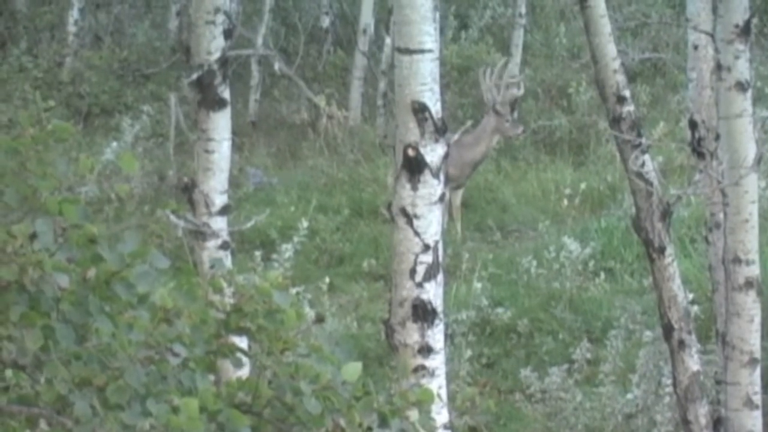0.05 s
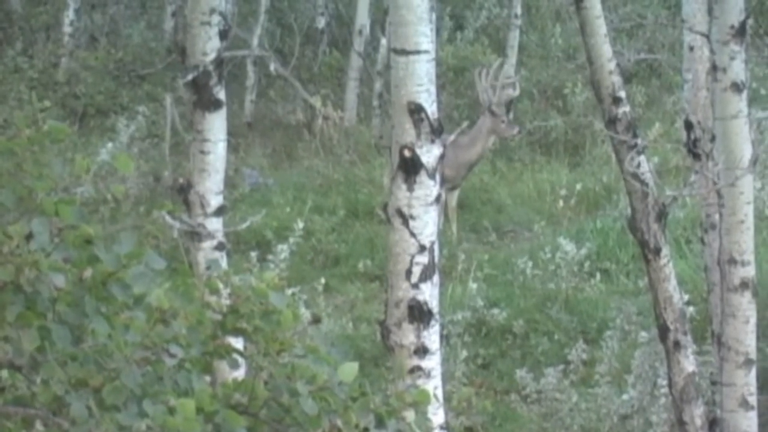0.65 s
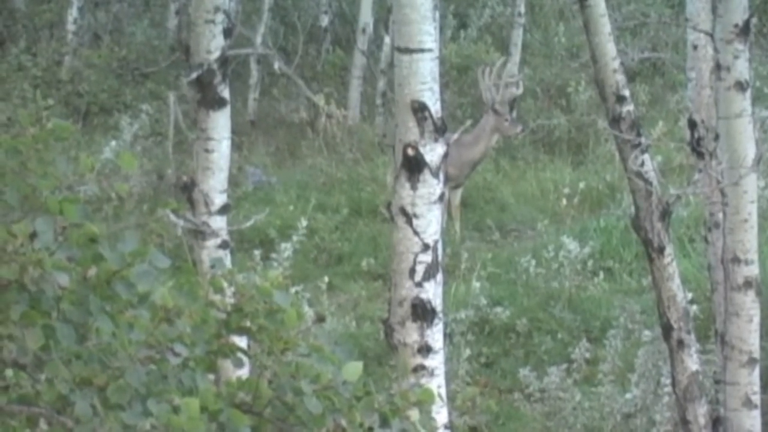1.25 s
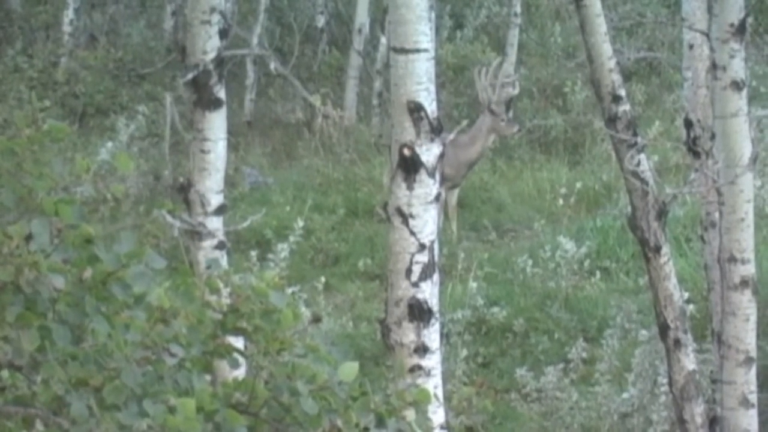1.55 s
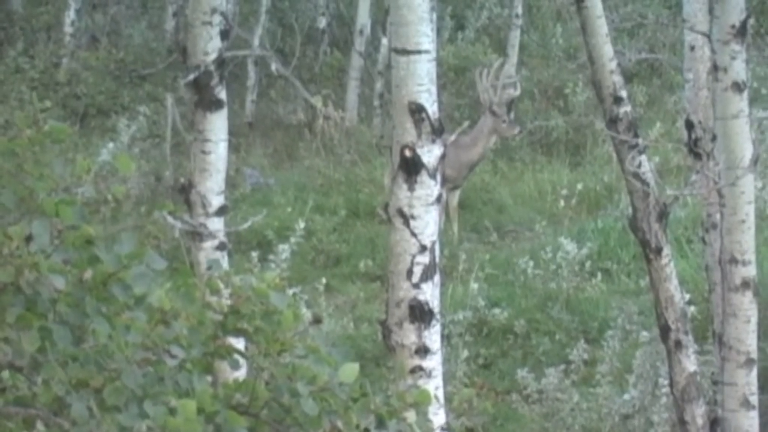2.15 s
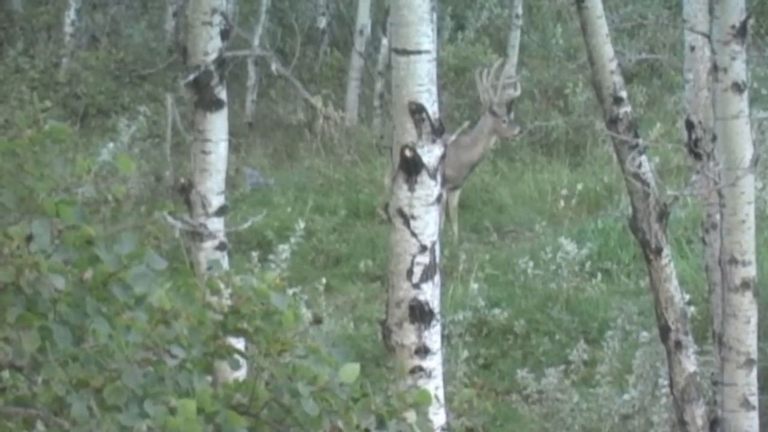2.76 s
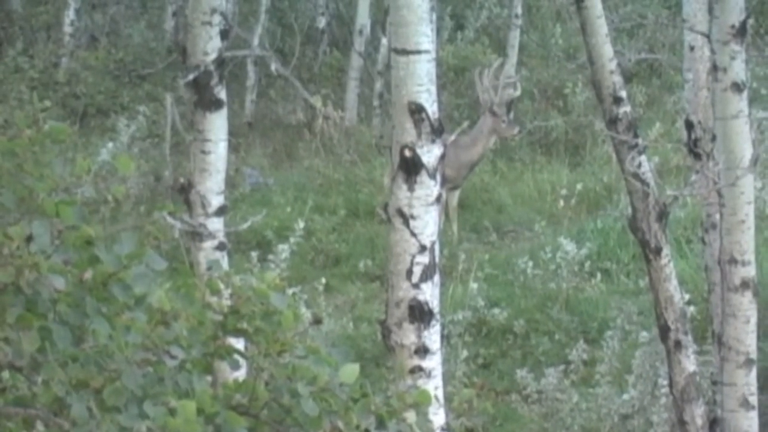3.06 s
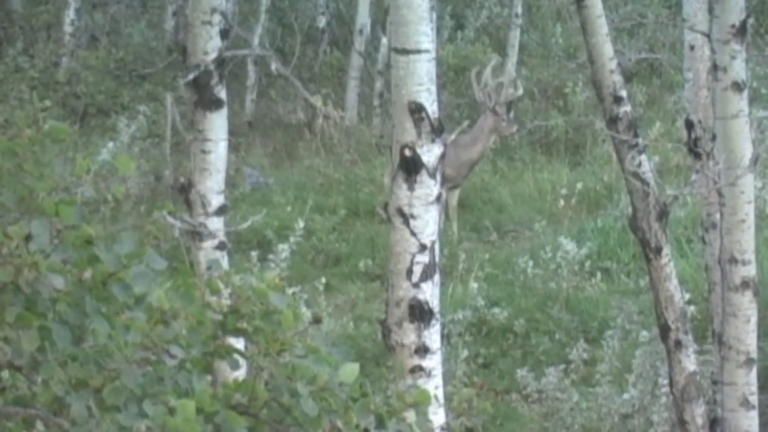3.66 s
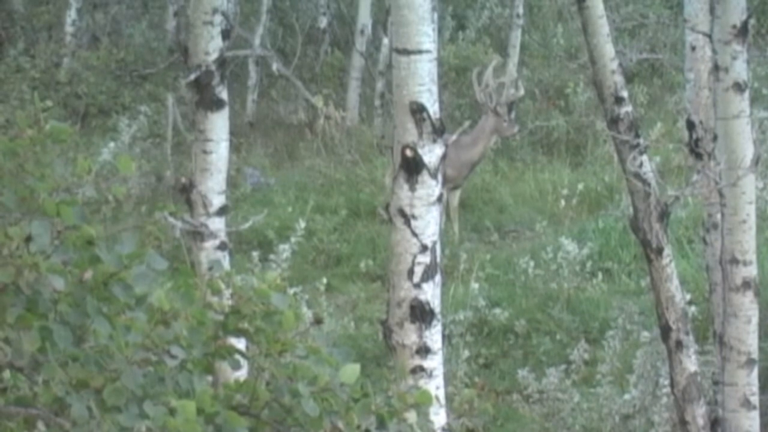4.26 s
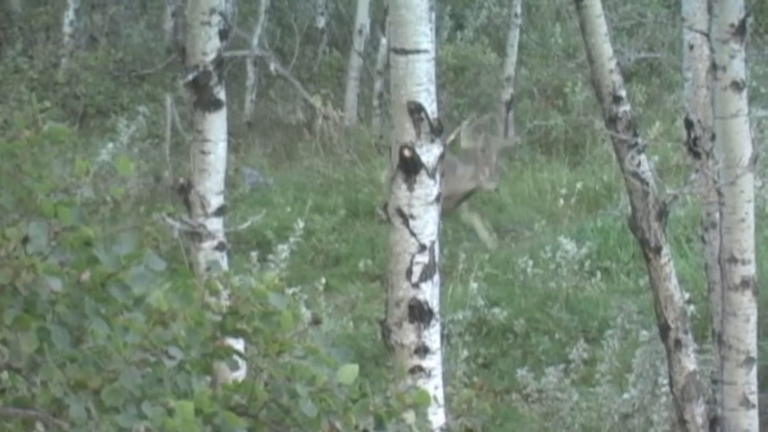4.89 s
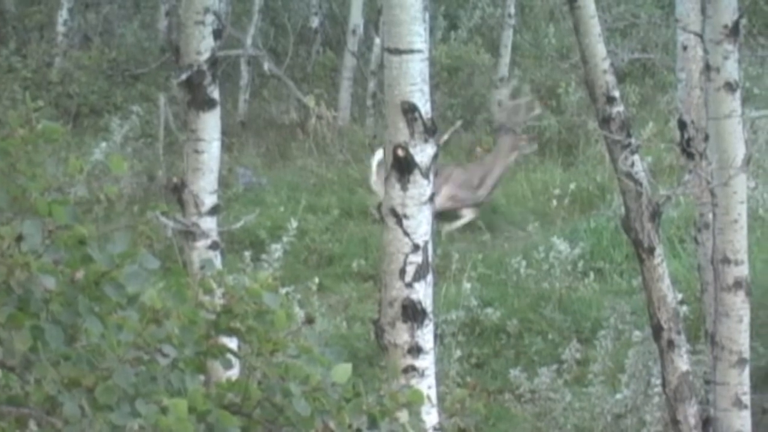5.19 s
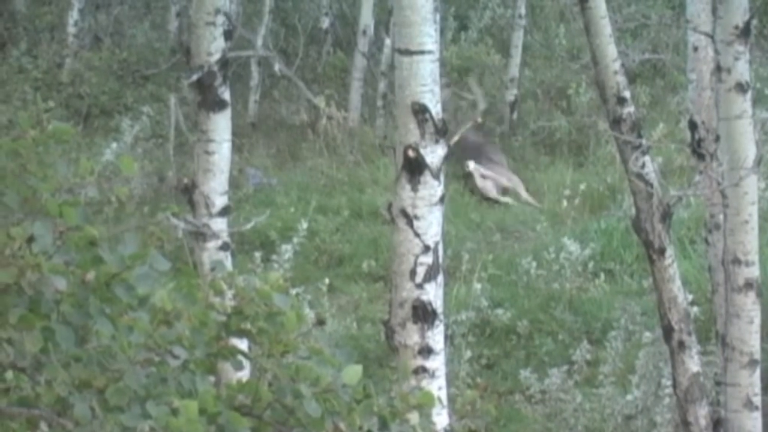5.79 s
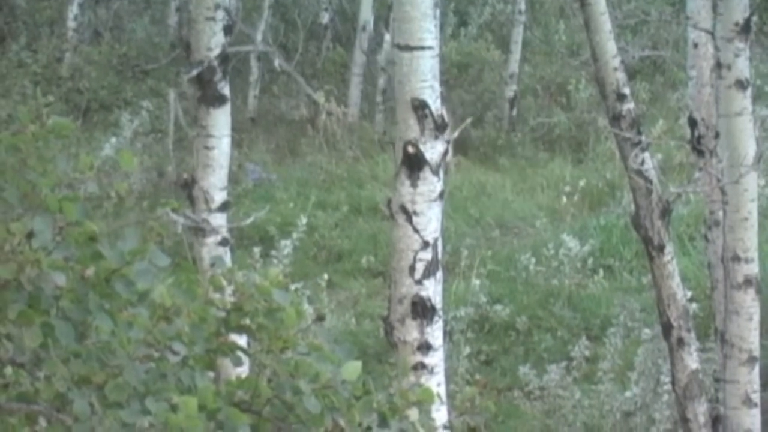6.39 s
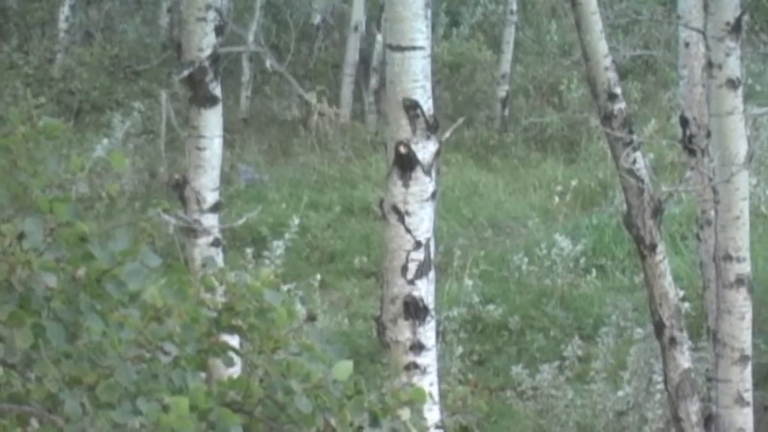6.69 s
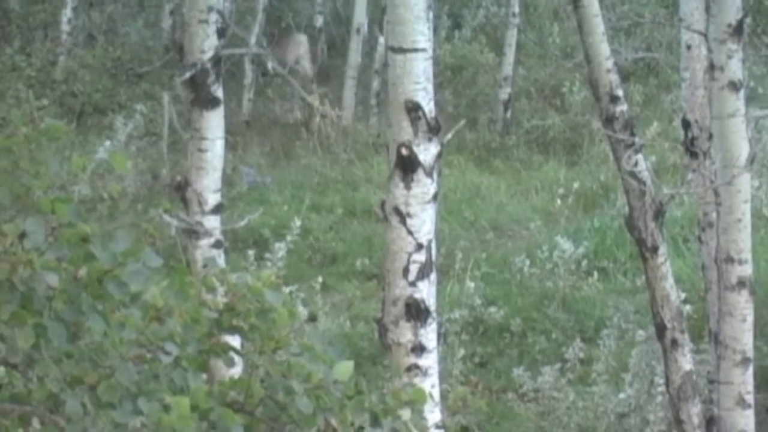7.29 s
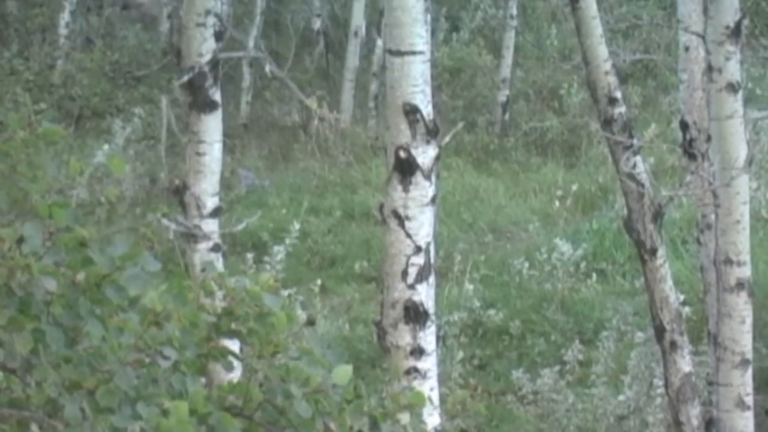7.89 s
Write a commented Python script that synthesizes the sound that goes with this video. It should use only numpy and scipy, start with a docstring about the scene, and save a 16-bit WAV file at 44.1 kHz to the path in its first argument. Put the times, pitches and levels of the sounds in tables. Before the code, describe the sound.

One sharp, loud bow shot cracks just left of the microphone after several seconds of soft outdoor air and faint grasshoppers. The string twangs, the trees echo briefly and the arrow lands with a slap and thump. Faint birdlike whistles follow as a deer runs off, its hooves thudding lightly under growing leaf rustle and breaking twigs. Hollow gear clacks and a low handling rumble come near the end.

```python
"""Bow shot at a deer in an aspen wood.

Grasshoppers hiss, then stop. Just left of a camera a compound bow fires: the release clicks, the arrow
zips over its rest, the string slaps and twangs. A third of a second later the arrow hits with a thump.
Faint whistles waver as the deer bounds off through brush, breaking twigs; gear clacks and rumbles."""
import sys
import numpy as np
from scipy import signal
from scipy.fft import rfft, irfft, next_fast_len
from scipy.io import wavfile
from scipy.ndimage import uniform_filter1d

SR = 44100
rng = np.random.default_rng(int(sys.argv[2]) if len(sys.argv) > 2 else 0)


def int16_out(signal):
    """Quantize to a 16-bit WAV file."""
    q = np.round(np.clip(np.atleast_2d(signal).T, -1, 1) * 32767)
    wavfile.write(sys.argv[1], SR, q.astype(np.int16))


N = 358974
T = np.arange(N) / SR
RELEASE_S, STRING_S, IMPACT_S = 4.6322, 4.6490, 4.9520


# Release, cams, string stop and fittings.
# Each row: start in seconds, level in dB, centre in Hz, t60 in seconds, left minus right in dB.
BOW_KNOCKS = [(4.6317, -31, 220, 0.049, 5), (4.6316, -17.5, 2100, 0.03, 12.5),
              (4.632, -7, 7900, 0.019, 4.5), (4.6363, -18, 6500, .016, 11), (4.6395, -16, 7000, 0.025, 7),
              (4.6503, -2, 8500, 0.0045, 2), (4.6510, -21, 1200, 0.04, 9), (4.6544, -11, 5200, 0.014, 7),
              (4.6740, -27, 6500, 0.016, 5), (4.6815, -31, 5500, .015, 8), (4.6895, -25, 5500, 0.012, 10)]
# String loop and cams. Each row: frequency in Hz, level in dB, t60 in seconds.
RELEASE_MODES = [(744, -35, 0.055), (1586, -20, .04), (2053, -20, .045), (2440, -21, .035),
                 (3520, -22, 0.033), (5700, -20, .025), (7580, -15, .025)]
# Each row: frequency in Hz, gain in dB.
BOW_ECHO_SPECTRUM = [(120, -5), (400, -4), (800, -3), (1200, -3.5), (2400, -6), (3500, -1.5), (5000, -4),
                     (8000, -10), (15000, -19.5)]

def bow():
    """Knocks, zip, buzz and twang, close on the left, echoed by the wood."""
    out = arrow_zip() + fittings_buzz()
    for s, db, hz, t60, pan_db in BOW_KNOCKS:
        side_db = -4.5 + 5.6 * np.log2(hz / 7000)  # the microphone ports differ only for short waves
        add(out, s, pan(crack(db, hz, t60, breadth=0.81, side_db=side_db, rise_s=0.00068), pan_db))
    add(out, RELEASE_S, ring(RELEASE_MODES, pan_db=13, rise_s=0.0004))
    add(out, STRING_S, twang())
    add(out, STRING_S, crack(db=-36, hz=113, t60=0.06, breadth=0.74))
    out[1] = np.roll(out[1], 2)  # the sound reaches the right port later
    echo = bang_echo(STRING_S, BOW_ECHO_SPECTRUM, early_db=-23, early_t60=0.081,
                     late_db=-34.5, late_t60=0.83, side_db=-8)
    return out + pan(echo, 2.7)


# Each row: harmonic number, level in dB, t60 in seconds.
STRING_PARTIALS = [(1, -39, 1.2), (2, -28.5, 0.52), (3, -45, .55), (4, -46.5, 0.83), (7, -51, .6),
                   (8, -51, .5)]
# Limbs, then riser and fittings. Each row: frequency in Hz, level in dB, t60 in seconds.
LIMB_MODES = [(112, -25, .04), (232, -16, .055), (610, -29, .05)]
RISER_MODES = [(104, -42, .5), (692, -38, .39), (847.5, -29, 0.28), (935, -25.5, 0.13), (1023, -33, .2),
               (1250, -41, .3), (1630, -41, .25), (2060, -36, 0.22), (2326, -38, .22), (2680, -21, 0.066),
               (3429, -38, .33), (3550, -34, .25), (4730, -45, .35)]

def twang(nominal_hz=140, slack=0.21, settle_s=0.011, sag_per_s=0.192, rough_db=0.7):
    """The string pulls taut, then sinks in pitch as its swing dies; limbs slam and the riser rings."""
    t = np.arange(SR) / SR
    pitch_hz = nominal_hz * (1 - slack * np.exp(-t / settle_s)) * (1 - sag_per_s * t)
    phase = 2 * np.pi * np.cumsum(pitch_hz) / SR
    string = 0
    for harmonic, db, t60 in STRING_PARTIALS:
        flicker_db = rough_db * min(harmonic, 4) * wander(34)[:SR]
        string += undb(db + flicker_db) * fade(t, t60) * np.sin(harmonic * phase)
    string *= 1 - np.exp(-t / 0.0018)
    return pan(string, 1) + ring(LIMB_MODES, pan_db=3) + ring(RISER_MODES, pan_db=6, rise_s=0.012)


# Each row: start in seconds, length in seconds, first pitch in Hz, last pitch in Hz, level in dB.
ZIPS = [(4.6444, 0.0026, 1900, 2900, -11), (4.6476, 0.0021, 3300, 4600, -8.5),
        (4.6544, 0.0014, 4600, 4150, -13.5), (4.6578, .001, 3900, 3500, -17)]

def arrow_zip(pan_db=16, rasp=0.21):
    """The shaft sings over its rest, rising as it speeds up and falling as the cams brake."""
    scrape = rasp * colour(rng.standard_normal(N), [(1500, 0), (6000, -7), (14000, -7)])
    out = np.zeros(N)
    for s, length_s, from_hz, to_hz, db in ZIPS:
        pitch_hz = glide(s, length_s, from_hz, (to_hz - from_hz) / length_s)
        phase = 2 * np.pi * np.cumsum(pitch_hz) / SR
        out += (np.sin(phase) + scrape) * swell(s, length_s, attack_s=0.00075, t60=0.0027) * undb(db)
    return pan(out, pan_db)


# Each row: centre in Hz, width in Hz, gain in dB.
BUZZ_MODES = [(524, 230, -13.5), (913, 100, -5), (1420, 610, -15), (2390, 770, -15.5), (3800, 1200, -22),
              (5400, 1100, -23), (9000, 6500, -22.5)]

def fittings_buzz(rate_hz=250, depth=0.38, db=-25):
    """Loose fittings chatter about twice per swing of the string while the limbs swing widely."""
    force = rng.standard_normal((2, N)) * (1 + depth * np.sin(2 * np.pi * rate_hz * T))
    metal = unit(resonate_modes(force, BUZZ_MODES))
    envelope = swell(s=4.652, length_s=0.036, attack_s=0.0065, t60=0.033)
    return pan(spread(metal, -6), 6.1) * envelope * undb(db)


# Each row: start in seconds, level in dB, centre in Hz, t60 in seconds.
HIT_CRACKS = [(4.9513, -20, 4000, 0.021), (4.9532, -12, 4900, 0.006), (4.953, -18, 540, 0.018),
              (4.9585, -23, 4000, 0.016), (4.9718, -30, 2700, .006)]
# Each row: frequency in Hz, gain in dB.
HIT_ECHO_SPECTRUM = [(100, 1), (250, -2.5), (500, -0.5), (1200, -4.5), (2500, -2.5), (4500, -6.5),
                     (7000, 1.5), (10000, -10), (15000, -21)]

def arrow_hit(thump_db=-19, thump_hz=165, delay_s=0.0136, width_s=0.0045):
    """The arrow slaps the hide and drives through; the chest thumps and booms, the clearing echoes."""
    out = np.zeros((2, N))
    for s, db, hz, t60 in HIT_CRACKS:
        add(out, s, crack(db, hz, t60, breadth=2.1, side_db=-22, rise_s=0.00054))
    t = T - IMPACT_S - delay_s
    out += undb(thump_db) * np.exp(-(t / width_s) ** 2) * np.sin(2 * np.pi * thump_hz * t)
    boom = ring([(110, -35.5, 0.17)])
    add(out, IMPACT_S + delay_s, boom)
    echo = bang_echo(IMPACT_S, HIT_ECHO_SPECTRUM, early_db=-33, early_t60=0.11,
                     late_db=-33, late_t60=0.46, side_db=-10)
    return out + pan(echo, 1)


# Each row: start in seconds, length in seconds, then relative levels of leaves, stems and ground in dB.
BOUNDS = [(4.99, .09, -48.5, -58, -58), (5.197, 0.038, -49.5, -54, -55), (5.28, 0.028, -51, -54, -68),
          (5.447, 0.14, -43.5, -56, -53), (5.536, 0.042, -47, -52, -58), (5.637, .025, -48, -55, -58),
          (5.675, 0.047, -46.5, -50, -51.5), (5.763, 0.085, -46.5, -58, -52), (5.892, 0.08, -44, -58, -54),
          (6.025, 0.06, -36, -53, -55), (6.13, .03, -46.5, -58, -60), (6.254, 0.032, -49, -60, -62),
          (6.333, .11, -49, -58, -63), (6.454, 0.098, -43.5, -55, -58), (6.565, 0.028, -47, -62, -62),
          (6.624, 0.027, -45, -58, -53), (6.751, .055, -46, -41, -56), (6.858, 0.054, -46, -49, -55),
          (6.989, 0.036, -45, -52.5, -60), (7.1, .05, -48, -44.5, -58), (7.22, 0.068, -44.5, -46, -48),
          (7.316, 0.094, -36, -46.5, -55), (7.562, 0.039, -35, -56, -62), (7.62, .03, -48, -50, -54),
          (7.776, 0.13, -50, -51, -61), (8.016, 0.039, -51, -53, -58)]
# Steady rustle, loudest in the densest thicket. Each row: time in seconds, level in dB.
THICKET_LEVELS = [(5.0, -58.5), (5.42, -57), (5.6, -50), (6.2, -51.5), (6.68, -49.5), (7.0, -43.5),
                  (7.46, -41), (7.74, -45), (8.0, -52.5), (8.14, -48.5)]
# Each row: frequency in Hz, gain in dB.
LEAF_SPECTRUM = [(1180, -38), (2000, -13.5), (2320, -11.5), (3200, -6), (3980, -6.5), (5250, -1),
                 (6820, -2), (7910, -4.5), (11000, -9), (12000, -8), (13800, -17), (16000, -29)]
STEM_SPECTRUM = [(400, -17.5), (900, -2.5), (1600, -7), (2600, -5), (4500, -5.5)]
GROUND_SPECTRUM = [(90, -9.5), (200, -2), (320, -3), (700, -11), (1400, -15.5)]

def brush(stems_db=-2.5, ground_db=-2.5, widen_from_s=6.4):
    """Leaves swish, stems crackle and turf rustles under each bound of the deer, over a steady rustle."""
    thicket = level_curve(THICKET_LEVELS)
    steady_ground = thicket ** 0.29 * undb(-45) * (T > THICKET_LEVELS[0][0])
    power = np.array([thicket, thicket * undb(-8), steady_ground]) ** 2
    for s, length_s, *levels_db in BOUNDS:
        power += np.outer(undb(levels_db), swell(s, length_s, attack_s=0.031, t60=0.26)) ** 2
    leaf_gain, stem_gain, ground_gain = np.sqrt(power)
    widen_db = 6 * np.clip(T - widen_from_s, 0, 1)  # the deer gets in among the trees
    leaves = grains(LEAF_SPECTRUM, per_s=9000, scatter_db=0.71, side_db=-19 + widen_db)
    leaves *= undb(1.03 * wander(70)) * leaf_gain
    stems = grains(STEM_SPECTRUM, per_s=1800, scatter_db=1.1, side_db=-10 + widen_db / 2)
    stems *= undb(stems_db + 2.2 * wander(50)) * stem_gain
    ground = grains(GROUND_SPECTRUM, per_s=700, scatter_db=1.8, side_db=-11)
    ground *= undb(ground_db) * ground_gain
    return pan(leaves, 0.2) + pan(stems + ground, 2.9)


# Each row: start in seconds, level in dB, centre in Hz, t60 in seconds, left minus right in dB.
SNAPS = [(1.101, -47, 1200, 0.012, 7), (4.8960, -39.5, 8500, 0.0043, 26), (5.235, -46, 1110, .025, 0),
         (5.483, -39, 5710, .025, 0), (5.687, -38.5, 2300, 0.027, -2), (5.7090, -36, 7040, .039, 0),
         (5.917, -41, 5310, .03, 0), (5.9782, -12.5, 13000, 0.0029, 14.5), (5.9792, -32, 6450, 0.0099, 14),
         (6.0009, -29, 12500, .006, 11), (6.464, -30.5, 6000, 0.039, 0), (6.73, -29.5, 5830, 0.019, 19),
         (6.783, -31, 3800, .04, 2), (6.8533, -27.5, 5000, 0.016, -1), (6.8785, -26, 4900, .015, -1),
         (6.894, -35, 3970, .025, 0), (7.0558, -30, 9000, .008, 10), (7.096, -29, 5700, .008, 0),
         (7.1041, -17, 9500, .003, -1), (7.1043, -15, 4600, 0.0079, -0.5), (7.1084, -27, 4800, .012, 0),
         (7.126, -38, 3500, .025, 0), (7.237, -34, 2400, 0.027, -1), (7.256, -32.5, 4000, .025, -2),
         (7.4075, -25, 3500, 0.016, -7), (7.639, -35, 4000, .025, 0), (8.119, -41.5, 3260, 0.036, 0)]
# Hooves and small stirs in the wood. Each row: start in seconds, level in dB, centre in Hz, t60 in seconds.
THUDS = [(.745, -49, 700, .033), (1.025, -49.5, 2490, .032), (1.10, -43.5, 600, .02),
         (1.607, -51, 800, .06), (5.075, -45, 447, 0.17), (5.085, -47, 130, .12), (5.21, -46.5, 350, .06),
         (5.590, -43.5, 290, 0.088), (5.592, -43, 1100, .04), (5.91, -47, 330, 0.12),
         (6.105, -46, 220, .093), (6.112, -45.5, 1300, 0.062), (6.275, -46, 300, .06),
         (6.458, -38, 230, .078), (6.462, -39, 900, 0.034), (6.875, -44.5, 140, .13),
         (7.1, -36.5, 160, 0.077), (7.4086, -27.5, 1400, 0.045), (7.4101, -35.5, 220, 0.085),
         (7.640, -40, 150, 0.093)]
# Each row: frequency in Hz, level in dB, t60 in seconds.
LOG_MODES = [(325.5, -21.5, 0.065), (550, -32, 0.055), (691, -31, .06), (1296, -26, 0.032),
             (1550, -26, 0.026), (3400, -24, .012)]

def twigs_and_hooves(log_s=7.4095):
    """Twigs snap, gear ticks and hooves thud on turf among the trees; one hoof rings a fallen log."""
    out = np.zeros((2, N))
    for s, db, hz, t60, pan_db in SNAPS:
        add(out, s, pan(crack(db, hz, t60, breadth=1.0, side_db=-19, rise_s=0.00016), pan_db))
    for s, db, hz, t60 in THUDS:
        add(out, s, crack(db, hz, t60, breadth=0.92, side_db=-9, rise_s=0.0014))
    echo_spectrum = [(100, -11.5), (6000, -6), (9000, -7), (14000, -17)]
    out += tree_echo(out, echo_spectrum, t60=0.25, wet_db=-10, side_db=-12)
    add(out, log_s, ring(LOG_MODES, pan_db=-5))
    return out


# Each row: start in seconds, force level in dB, t60 in seconds, left minus right in dB.
CLACKS = [(6.7018, -11, .005, 14), (6.7035, -18.5, 0.021, 14.5), (6.731, -25.5, 0.021, 12),
          (6.737, -27, .02, 11), (6.7570, -34, 0.025, 2), (6.7784, -29, 0.035, 1), (6.804, -29, .04, 9.5),
          (6.928, -32, .03, -1)]
# Each row: centre in Hz, width in Hz, gain in dB.
GEAR_MODES = [(1060, 390, -7.5), (1583, 150, -10), (2130, 450, -9.5), (2713, 80, -3), (3030, 50, 6.5),
              (3542, 150, 1), (4230, 900, -5), (5125, 95, 6.5), (7000, 830, -14)]
# Each row: start in seconds, length in seconds, relative level in dB.
GRIP_SHIFTS = [(6.512, .04, -52), (6.87, 0.13, -54), (7.075, 0.18, -47.5), (7.3, 0.11, -57),
               (7.605, 0.047, -47)]

def gear(rumble_db=-4.5):
    """Hollow gear clacks; hands rumble on the camera and stay restless after the hit."""
    force = np.zeros((2, N))
    for s, db, t60, pan_db in CLACKS:
        add(force, s, pan(crack(db, 2700, t60, breadth=2.2, side_db=-22, rise_s=0.00022), pan_db))
    clacks = resonate_modes(force, GEAR_MODES)
    rumble = colour(rng.standard_normal(N), [(22, -13), (50, -12), (85, 5), (130, -8.5)])
    grip = sum(undb(db) * swell(s, length_s, attack_s=0.04, t60=0.26) for s, length_s, db in GRIP_SHIFTS)
    restless = undb(-65.5) * (T > IMPACT_S)
    return clacks + rumble * (grip + restless) * undb(rumble_db)


# Each row: start in seconds, length in seconds, pitch in Hz, glide in Hz per second,
# waver as a share of pitch, relative level in dB, octave over fundamental in dB.
WHISTLES = [(5.297, 0.09, 1652, 150, .019, -52, 3.5), (5.382, .012, 1680, -12000, 0, -56, 4),
            (5.46, .036, 1520, 13000, 0.0064, -53, -12), (5.652, .048, 1684, 200, .004, -51, -3),
            (5.686, .032, 1715, 1100, .004, -53, 12), (5.72, .008, 1690, -10000, 0, -58, 11),
            (5.735, .035, 1740, 0, .006, -58, 7)]
# Each row: frequency in Hz, gain in dB.
WHISTLE_ECHO_SPECTRUM = [(100, -11), (300, 0), (1000, -1), (3500, -2), (6000, 0), (14000, -6)]

def whistles(gain_db=-4, waver_hz=33, roughness=0.011, flutter_db=1.5, attack_s=0.011):
    """Hoarse, wavering notes with a strong octave, far to the right, perhaps a startled bird."""
    call = np.zeros(N)
    for s, length_s, hz, hz_per_s, share, db, octave_db in WHISTLES:
        waver = -share * np.cos(2 * np.pi * waver_hz * (T - s - attack_s)) + roughness * wander(500)
        phase = 2 * np.pi * np.cumsum(glide(s, length_s, hz, hz_per_s) * (1 + waver)) / SR
        tone = np.sin(phase) + undb(octave_db) * np.sin(2 * phase)
        call += tone * swell(s, length_s, attack_s, t60=0.035) * undb(db)
    call = pan(call * undb(gain_db + flutter_db * wander(150)), -9.5)
    return call + tree_echo(call, WHISTLE_ECHO_SPECTRUM, t60=0.39, wet_db=-5, side_db=2)


# Each row: start in seconds, length in seconds, relative level in dB, swell in dB per second,
# left minus right in dB.
GRASSHOPPER_PHRASES = [(-.05, .15, -56.5, 0, -3), (.1, 0.17, -67, 0, -2), (0.238, 0.3, -61, -1, -2.5),
                       (0.523, 2.19, -57, 1.5, -1.5), (.76, 1.605, -55, 4.5, -4.8),
                       (2.713, 0.97, -55.5, -0.5, 0), (3.59, .06, -56, 0, 0)]
# Each row: frequency in Hz, gain in dB.
GRASSHOPPER_SPECTRUM = [(3530, -40), (6000, -19), (7490, -10), (8400, -2.5), (9600, -1), (10800, -5.5),
                        (12700, -3.5), (13400, -5.5), (14900, -14), (15500, -26), (16000, -30)]

def grasshoppers(gain_db=0.36, shimmer_db=1.15, waver_db=0.8):
    """Dense file strokes merge into a high, shimmering hiss; overlapping phrases add in power."""
    power = 0
    for s, length_s, db, db_per_s, pan_db in GRASSHOPPER_PHRASES:
        effort = undb(db + db_per_s * np.clip(T - s, 0, length_s))
        power += pan(effort * swell(s, length_s, attack_s=0.063, t60=0.31), pan_db) ** 2
    hiss = grains(GRASSHOPPER_SPECTRUM, per_s=7000, scatter_db=1.3, side_db=-3.2)
    return hiss * np.sqrt(power) * undb(gain_db + shimmer_db * wander(55) + waver_db * wander(11))


# Each row: frequency in Hz, gain in dB.
AIR_SPECTRUM = [(25, -13), (50, -8.5), (90, -1.5), (145, 3), (210, -2.5), (270, -5), (320, -1), (450, -7),
                (800, -11), (1600, -14), (3400, -17.5), (6400, -19.5), (12000, -24), (16000, -30)]
# Each row: time in seconds, level in dB.
BREEZE_LEVELS = [(.3, -86), (.8, -69), (1.5, -72), (2.1, -64), (2.5, -71), (3, -87)]

def air(db=-58):
    """Soft air, alike on both sides only in the bass, and a light breeze on the microphone."""
    mid, side = colour(rng.standard_normal((2, N)), AIR_SPECTRUM)
    side = signal.sosfilt(signal.butter(1, 290, "high", fs=SR, output="sos"), side)
    still = spread([mid, side], -1.3) * undb(db + 0.5 * wander(5.1))
    breeze = colour(rng.standard_normal((2, N)), [(22, -8), (50, 3), (110, -8)])
    return still + spread(breeze, -9) * level_curve(BREEZE_LEVELS)


# Each row: pitch in Hz, waver as a share of pitch, level in dB, peak time in seconds, width in seconds.
HUMS = [(402, 0.00797, -67.5, 3.67, 1.17), (202.5, 0.014, -63.5, 6.9, 2.1)]
# Each row: frequency in Hz, level in dB.
WHINE_TONES = [(1497, -79.5), (4048, -82.5), (4190, -80.5), (4495, -78), (4795, -82.5), (5095, -82),
               (5394, -74.5)]
# Each row: frequency in Hz, gain per filter pass in dB.
BODY_SPECTRUM = [(135, -3), (150, 0), (172, -4)]

def camera_hum(body_db=-68):
    """Soft hums swell, the motor whines and the camera body shakes its two ports against each other."""
    hum = whine = 0
    for hz, share, db, peak_s, width_s in HUMS:
        envelope = undb(db) * np.exp(-((T - peak_s) / width_s) ** 2 / 2)
        phase = 2 * np.pi * hz * np.cumsum(1 + share * wander(30)) / SR
        hum += envelope * np.sqrt(2) * np.sin(phase)
    for hz, db in WHINE_TONES:
        envelope = undb(db + 2.5 * wander(20))
        whine += envelope * np.sqrt(2) * np.sin(2 * np.pi * hz * T + 0.7 * wander(60))
    body = colour(colour(rng.standard_normal(N), BODY_SPECTRUM), BODY_SPECTRUM) * undb(body_db)
    return body * np.array([[1], [-1]]) + hum * undb(1.6 * wander(9)) + whine


def bang_echo(s, spectrum, early_db, early_t60, late_db, late_t60, side_db):
    """Near trunks answer a bang first, then countless leaves further off."""
    age = np.maximum(T - s, 0)
    decay = undb(early_db) * fade(age, early_t60) + undb(late_db) * fade(age, late_t60)
    onset = 1 - np.exp(-age / 0.0042)
    return grains(spectrum, per_s=16000, scatter_db=1.5, side_db=side_db) * decay * onset


def tree_echo(x, spectrum, t60, wet_db, side_db):
    """Trunks and foliage scatter back many small echoes."""
    t = np.arange(SR) / SR
    echoes = colour(rng.standard_normal((2, SR)) * rng.exponential(size=(2, SR)), spectrum)
    envelope = fade(t, t60) * (1 - np.exp(-t / 0.0058))
    response = unit(spread(echoes, side_db) * envelope) / np.sqrt(SR)
    return undb(wet_db) * signal.fftconvolve(x.mean(axis=0)[None], response, axes=1)[:, :N]


def crack(db, hz, t60, breadth, side_db=-12, rise_s=0.0004):
    """A contact: a short spray of force rings one broad resonance."""
    t = np.arange(SR // 4) / SR
    envelope = fade(t, t60) * (1 - np.exp(-t / rise_s))
    force = rng.standard_normal((2, len(t))) * envelope
    pair = resonate(resonate(force, hz, hz * breadth), hz, hz * breadth)
    return spread([unit(x) for x in pair], side_db) * np.sqrt(np.mean(envelope ** 2)) * undb(db)


def ring(modes, pan_db=0, rise_s=0.0013):
    """Free decay of (Hz, dB, t60) modes; those below 1 kHz are panned less."""
    t = np.arange(SR) / SR
    tones = 0
    for hz, db, t60 in modes:
        tone = undb(db) * fade(t, t60) * np.sin(2 * np.pi * (hz * t + rng.random()))
        tones += pan(tone, pan_db * min(hz / 1000, 1))
    return tones * (1 - np.exp(-t / rise_s))


def grains(spectrum, per_s, scatter_db, side_db):
    """A wide stream of tiny filtered clicks of uneven size."""
    sizes = undb(scatter_db * np.minimum(rng.exponential(size=(2, N)), 4))
    clicks = rng.standard_normal((2, N)) * sizes * (rng.random((2, N)) < per_s / SR)
    return spread(colour(clicks, spectrum), side_db)


def colour(x, spectrum):
    """Shape by a (Hz, dB) spectrum with steep ends; rms 1."""
    hz, db = np.transpose(spectrum)
    size = next_fast_len(x.shape[-1])
    f = np.maximum(np.arange(size // 2 + 1) * SR / size, 1)
    skirts = np.minimum(1, np.minimum(f / hz[0], hz[-1] / f)) ** 4
    gain = undb(np.interp(np.log(f), np.log(hz), db)) * skirts
    return unit(irfft(rfft(x, size) * gain, size)[..., :x.shape[-1]])


def resonate(x, hz, width_hz):
    """One resonance, gain 1 at its centre."""
    q = hz / min(width_hz, 0.3 * SR)
    return signal.lfilter(*signal.iirpeak(min(hz, 0.45 * SR), q, fs=SR), x)


def resonate_modes(force, modes):
    """Parallel resonances driven by one force."""
    return sum(undb(db) * resonate(force, hz, width_hz) for hz, width_hz, db in modes)


def swell(s, length_s, attack_s, t60):
    """Envelope that rises from time s, holds until its length is over, then dies away."""
    age = T - s
    return np.clip(age / attack_s, 0, 1) * fade(np.clip(age - length_s, 0, 3 * t60), t60)


def glide(s, length_s, hz, hz_per_s):
    """Pitch that slides evenly through an event."""
    return hz + hz_per_s * np.clip(T - s, 0, length_s)


def wander(rate_hz):
    """Smooth random drift, rms 1."""
    step = max(int(SR / rate_hz), 1)
    stairs = np.repeat(rng.standard_normal(N // step + 1), step)
    return unit(uniform_filter1d(stairs, step)[:N])


def level_curve(rows):
    """Gain along (s, dB) rows, silent outside them."""
    times_s, db = np.transpose(rows)
    return undb(np.interp(T, times_s, db, left=-120, right=-120))


def fade(t, t60):
    """Exponential decay, 60 dB in t60 seconds."""
    return np.exp(-np.log(1000) * t / t60)


def spread(pair, side_db):
    """Mid and side to left and right."""
    return pair[0] + pair[1] * undb(side_db) * np.array([[1], [-1]])


def pan(x, db):
    """Place a sound by its left minus right level."""
    return x * undb(np.array([[db], [-db]]) / 2)


def add(out, s, x):
    """Mix a short stereo sound in at time s."""
    start = int(s * SR)
    out[:, start:start + x.shape[1]] += x[:, :N - start]


def undb(db):
    """Decibels to gain."""
    return 10 ** (np.asarray(db) / 20)


def unit(x):
    """Scale to rms 1."""
    return x / np.sqrt(np.mean(x ** 2) + 1e-20)


def scene():
    """The wait, the shot and the deer's flight."""
    background = air() + camera_hum() + grasshoppers()
    return background + bow() + arrow_hit() + whistles() + brush() + twigs_and_hooves() + gear()


def record(dry):
    """The camera clips the loudest peaks and cuts the top."""
    ceiling, top_hz = 0.86, 15700
    lowpass = signal.ellip(8, 0.2, 70, top_hz, fs=SR, output="sos")
    return signal.sosfilt(lowpass, np.clip(dry, -ceiling, ceiling))


dry = scene()
out = record(dry)
int16_out(out)
```